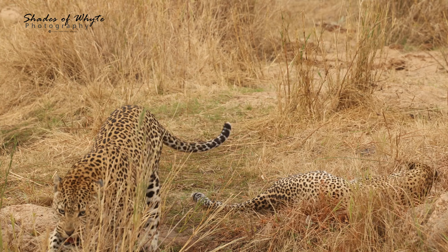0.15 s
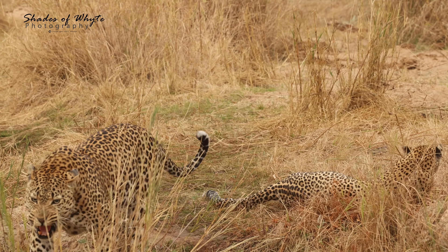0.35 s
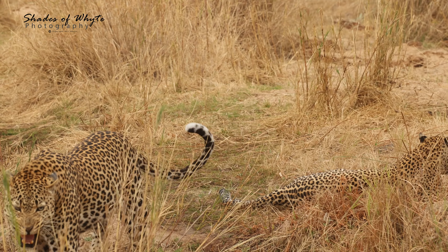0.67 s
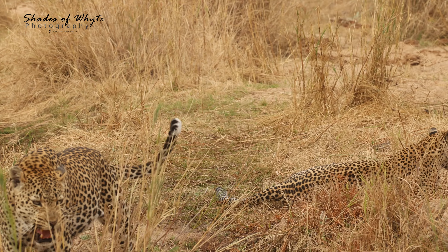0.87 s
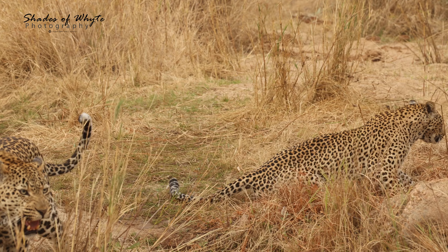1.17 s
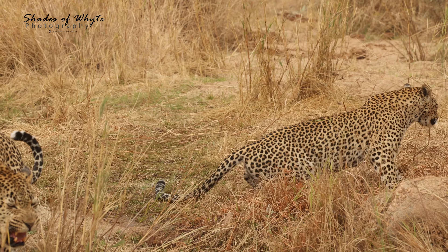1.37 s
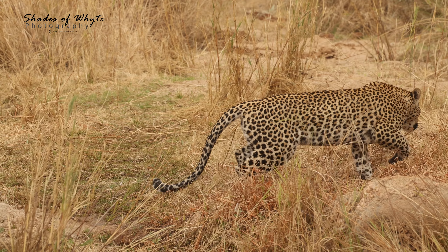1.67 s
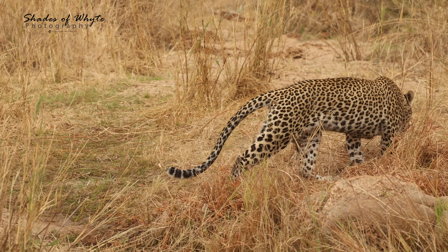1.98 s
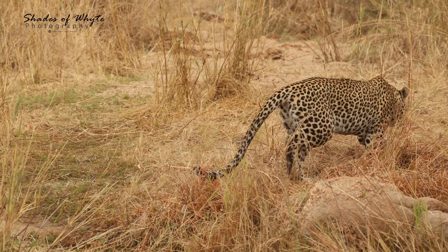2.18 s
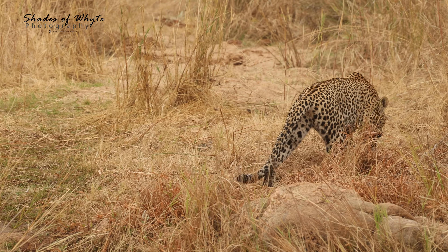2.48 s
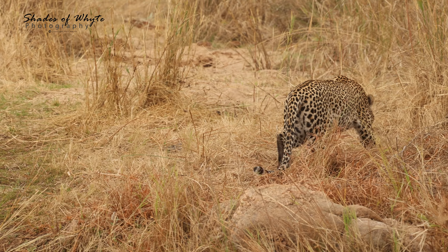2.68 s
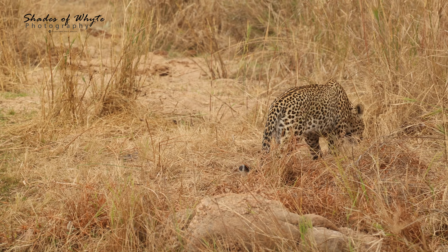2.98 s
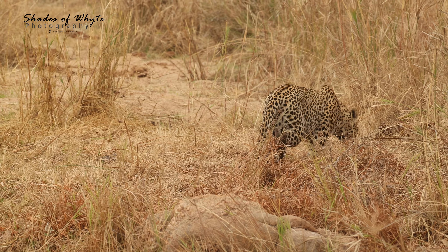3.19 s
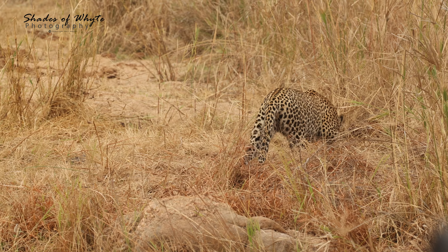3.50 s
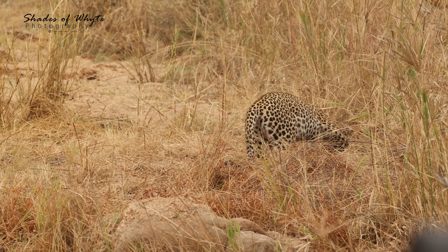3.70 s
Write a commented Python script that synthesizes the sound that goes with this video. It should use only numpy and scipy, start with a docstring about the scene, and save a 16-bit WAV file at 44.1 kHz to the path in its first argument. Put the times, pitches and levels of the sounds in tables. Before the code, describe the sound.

Leopards snarl and growl fiercely in dry grass, then grumble low before a sharp click

```python
"""Growls and snarls of two leopards in dry grass run throughout: throat flaps that ring the chest and send
puffs through the mouth, over rough air and wavering whistles. Some later growls have a nearly shut mouth.
Dry grass ticks are short noise bursts; close by on the left, shaped noise scuffs and clicks sharply.
Filtered noise underneath gives still air, a high hiss, a thin whine and an insect's throbbing trill."""
import sys
import numpy as np
from scipy import signal
from scipy.fft import rfft, irfft, next_fast_len
from scipy.io import wavfile

SR = 44100
rng = np.random.default_rng(int(sys.argv[2]) if len(sys.argv) > 2 else 0)


def store_pcm(level_fs):
    """Save levels as 16-bit WAV."""
    pcm = np.round(np.clip(level_fs, -1, 1) * 32767).astype(np.int16)
    wavfile.write(sys.argv[1], SR, np.atleast_2d(pcm).T)


N = 169785
T = np.arange(N) / SR

# Runs of throat flaps: (first flap [s], last flap [s], nominal rate [flaps/s], last gap / first gap [ratio],
# nominal chest pitch [Hz], nominal chest T60 [s])
GROWLS = [(0.025, 0.208, 27, 1, 153.5, 0.084), (0.242, .408, 49, 1, 178, 0.023),
          (0.451, 0.487, 24, 1, 166, 0.065), (0.6, 0.638, 26, 1, 221, 0.036),
          (0.654, 0.737, 13, 1, 167, 0.025), (.795, 1.008, 19, 1.15, 157, 0.055),
          (1.15, 1.166, 38, 1, 166, 0.04), (1.217, 1.328, 37, 1, 173, 0.033),
          (1.365, 1.424, 33, 0.98, 164, 0.025), (1.577, 1.798, 18, 1.4, 163, 0.076),
          (2.107, 2.136, 33, 1, 183, 0.039), (2.324, 2.366, 23, 1, 197, 0.046),
          (2.566, 2.761, 15.4, 1.2, 160.3, 0.087), (2.738, 2.928, 53, 1, 235.5, 0.068),
          (3.135, 3.347, 14, 1, 248.5, 0.11), (3.532, 3.655, 57, 0.956, 241, 0.056),
          (3.686, 3.833, 14, 1.1, 235, 0.13)]
# Effort through each snarl, before trims:
# (time [s], chest thump [dB], mouth puff [dB], air [dB])
LUNGE = [(0, -38, -38, -29.5), (.03, -26.5, -26, -36), (.066, -29.5, -41, -40.5)]
ROAR = [(.066, -32, -53, -45.5), (.1, -22.5, -32, -42.5), (.135, -32.5, -36.5, -42),
        (.175, -27.5, -55, -52), (.21, -24.5, -67, -47.5), (.27, -21.5, -58, -71), (.34, -27, -55, -58)]
SPIT = [(.34, -20, -59, -57.5), (.378, -21.5, -57, -49), (.392, -33, -39, -50), (.41, -19, -43, -45.5),
        (.45, -53, -41.5, -52), (.53, -34, -61, -52.5), (.6, -29.5, -43, -41.5), (.64, -33, -43.5, -50.5),
        (.66, -48, -35.5, -59), (.69, -50, -75, -78)]
HISS = [(.69, -50, -55, -60), (.727, -30, -38, -48.5), (.735, -35, -35.5, -38.5), (.81, -43, -49, -42),
        (.86, -40, -34.5, -46), (.9, -29, -36, -45), (.95, -35, -41, -56.5), (1.01, -42.5, -65, -56.5),
        (1.1, -55, -68, -74.5)]
RATTLE = [(1.12, -43.5, -76, -58), (1.22, -39.5, -49, -58), (1.25, -39, -44.5, -62),
          (1.275, -51, -48.5, -53), (1.302, -31, -41, -60), (1.33, -28.5, -39.5, -63),
          (1.365, -36, -44.5, -50), (1.395, -28.5, -41.5, -62), (1.43, -52, -45.5, -57),
          (1.5, -55, -60, -64.5)]
WARNING = [(1.52, -55, -60, -62), (1.535, -52, -55, -49.5), (1.575, -47.5, -39.5, -46.5),
           (1.625, -41.5, -31.5, -55), (1.68, -40.5, -40, -49.5), (1.74, -33.5, -42, -51.5),
           (1.805, -43, -39.5, -64), (1.86, -50, -37, -62.5)]
MUTTER = [(2.08, -60, -59, -77), (2.14, -42.5, -59.5, -65.5), (2.33, -47.5, -47, -63.5),
          (2.38, -49, -68, -64), (2.47, -55, -60, -62)]
PARTING = [(2.555, -39, -41.5, -49), (2.58, -43, -38, -51.5), (2.63, -42, -38.5, -47.5),
           (2.69, -48, -39.5, -56.5), (2.742, -43, -70, -56), (2.765, -38.5, -54, -64),
           (2.8, -51.5, -64, -64)]
GRUMBLE = [(2.8, -43.5, -68, -62), (2.89, -42.5, -61.5, -66), (2.95, -56.5, -55, -76),
           (3.13, -47, -64, -82), (3.28, -43, -51.5, -76), (3.35, -46.5, -55.5, -72),
           (3.53, -39.5, -60, -61), (3.64, -43.5, -55.5, -79), (3.7, -42.5, -52.5, -56.5),
           (3.76, -47.5, -66, -64.5), (3.85, -51, -55, -58)]
# Mouth resonances of each snarl: (frequency [Hz], width [Hz], relative level [dB])
LUNGE_MOUTH = [(1010, 140, -4), (1420, 66, -5), (1680, 93, 4), (2620, 24, -7), (3070, 37, -7.5),
               (3730, 85, -10)]
ROAR_MOUTH = [(532, 21, 2), (960, 150, -11.5), (1388, 27, -5.5), (1660, 27, -5.5), (1910, 89, -12),
              (2420, 170, -8), (3085, 110, -12)]
SPIT_MOUTH = [(1003, 194, 1.5), (2014, 250, 0), (2870, 140, -28), (3740, 32, -24), (3980, 57, -2.5),
              (4610, 120, -7), (5340, 310, -12.5), (6900, 68, -1.5)]
HISS_MOUTH = [(950, 66, -3), (1310, 58, -1.5), (1573, 25, -0.5), (1904, 8, 2), (2160, 41, -6.5),
              (2477, 20, 0.5), (2950, 130, -13), (4260, 340, -19.5), (5500, 130, -26)]
RATTLE_MOUTH = [(872, 150, -2), (1707, 59, -2), (1956, 43, -5), (2970, 180, -16), (3260, 50, -18),
                (3740, 260, -33), (4500, 60, -16)]
WARNING_MOUTH = [(914, 110, -3.5), (1224, 39, 0.5), (1495, 34, -8), (2120, 370, -13), (3220, 66, -15),
                 (3670, 21, -21)]
PARTING_MOUTH = [(940, 105, -0.5), (1213, 55, 2), (1523, 19, -2.5), (1760, 49, -11), (2090, 190, -9.5),
                 (3080, 32, -29)]
SHUT_MOUTH = [(840, 140, 2), (1160, 170, -3.5), (1760, 160, -13.5)]
# Snarls, panned before the cats' shared balance:
# (effort [table], mouth [table], left over right [dB], broad rasp [dB])
SNARLS = [(LUNGE, LUNGE_MOUTH, 1, -5), (ROAR, ROAR_MOUTH, 1, -4.5), (SPIT, SPIT_MOUTH, 0.67, -4),
          (HISS, HISS_MOUTH, 0.87, -5), (RATTLE, RATTLE_MOUTH, 1, -3.5), (WARNING, WARNING_MOUTH, 0, -8),
          (MUTTER, SHUT_MOUTH, -0.64, -17), (PARTING, PARTING_MOUTH, -0.13, -8.5),
          (GRUMBLE, SHUT_MOUTH, -0.19, 4)]
# Colour of the broad rasp: (frequency [Hz], relative level [dB])
RASP = [(200, 8), (400, 2), (700, -9), (1000, -15.5), (2000, 1), (4000, -6.5), (6500, -16.5), (9000, -28),
        (15000, -38)]
# Colour of the breath ahead of the mouth resonances: (frequency [Hz], relative level [dB])
AIR_COLOUR = [(300, -20), (550, 0), (950, 1.5), (1400, -2), (5000, -4), (9000, -25), (15000, -22)]
# Chest modes: (multiple of chest pitch [ratio], relative level [dB], share of chest T60 [ratio])
CHEST = [(.45, -7, 1.35), (.8, -2.5, 1.06), (1.05, 3, 1.02), (1.6, -8.5, 0.83), (2.7, -15.5, 0.3)]
# Whistles in the throat, before waver: (start [s], end [s], start pitch [Hz], end pitch [Hz], level [dB])
WHISTLES = [(0, 0.047, 1690, 1800, -35), (.09, 0.161, 565, 530, -45.5), (.15, 0.23, 1610, 1605, -56),
            (0.726, .895, 2490, 2425, -47), (.735, 0.823, 1250, 1310, -46),
            (1.616, 1.724, 1195, 1255, -57.5)]
# Tonal balance of the cats between the sides: (frequency [Hz], left over right [dB])
CATS_BALANCE = [(150, -0.68), (300, -1.8), (1000, 0.91), (2200, -1.5), (4500, 2.4)]
# Dull ground echoes: (delay [s], level [dB])
GROUND = [(.0065, -11), (0.0133, -17), (.033, -10.5)]
# Colour of the still air: (frequency [Hz], relative level [dB])
FLOOR = [(15, -53), (25, -2), (140, -1), (274, -9), (349, 0.5), (598, -6), (741, -9.5), (804, -8.5),
         (1710, -15.5), (3170, -19), (3720, -18.5), (4040, -18.5), (5580, -16.5), (7100, -22),
         (15500, -27.5)]
# High hiss through time, before its trim: (time [s], level [dB])
TREBLE = [(0, -69), (.25, -72), (1.45, -72), (1.82, -69), (1.92, -65), (2.3, -63.5), (2.65, -61.5),
          (2.7, -69), (2.8, -61.5), (2.93, -66.5), (3.0, -65), (3.2, -67.5), (3.3, -64), (3.85, -67)]
# Colour of the high hiss: (frequency [Hz], relative level [dB])
TREBLE_COLOUR = [(1000, 2), (3700, 4.5), (6000, 1), (10000, -2), (12500, -1), (15500, -2.5)]
# Thin whine: (frequency [Hz], level [dB], width [Hz])
WHINE = [(3645, -71.5, 19), (7740, -78.5, 80)]
# Likeness of the two sides in wide noise: (frequency [Hz], left-right correlation [ratio])
LIKENESS = [(60, .98), (170, 0.65), (350, 0.26), (1000, 0.23), (3000, 0.15), (8000, 0.045), (15000, 0.032)]
# Insect trill through time, before its throb: (time [s], level [dB])
INSECT = [(0, -75), (2.4, -80), (2.8, -73), (3.85, -74.5)]
# Dry grass ticks, before their trim: (time [s], level [dB])
TICKS = [(2.7345, -50), (2.8459, -45), (2.875, -48), (3.2037, -45), (3.2757, -53), (3.4101, -52),
         (3.679, -46.5), (3.7473, -49)]
# Colour of the ticks: (frequency [Hz], relative level [dB])
TICK_COLOUR = [(1500, -18), (4000, -5), (7000, 4), (10000, -12), (15000, -18)]
# Scuffs around the click: (time [s], level [dB], rise constant [s], fall constant [s])
SCUFFS = [(3.367, -50.5, 0.0047, 0.015), (3.413, -48, 0.0024, 0.0067), (3.456, -41, 0.015, .014),
          (3.479, -42.5, 0.0022, 0.012), (3.525, -45.5, 0.021, 0.028), (3.556, -46.5, .008, .007)]
# Colour of the scuffs: (frequency [Hz], relative level [dB])
SCUFF_COLOUR = [(200, -11), (700, 0), (1500, 2.5), (2800, 0), (4000, -8), (5500, -7.5), (8000, -16),
                (15000, -34)]
# Sharp click close by: (time [s], level [dB], decay constant [s])
CLICKS = [(3.4896, -25, 0.0032)]
# Colour of the click: (frequency [Hz], relative level [dB])
CLICK_COLOUR = [(200, -15), (550, -36), (850, 2), (1300, 8.5), (1800, -26), (2500, 9), (3400, -12),
                (5300, -5), (7000, -13.5), (11000, -18.5), (15000, -26)]
# Tonal balance of the click and scuffs between the sides: (frequency [Hz], left over right [dB])
CLICK_BALANCE = [(200, 3), (1000, 3), (2300, 11), (5000, 11), (12000, 8)]

FLAP_SOFT_HZ, FLAP_SCATTER_DB, PITCH_SCATTER = 407, 2.8, 0.045  # pitch scatter is a ratio
PUFF_RISE_S, PUFF_FALL_S = 0.0013, 0.0063
PUFF_TRIM_DB, AIR_TRIM_DB, AIR_ROUGH_DB = 1, -3, 3
FADE_S = 0.016
CATS_LEAD_S, CLICK_LEAD_S = 0.00003, 0.000227  # left side leads
ECHO_DB, ECHO_T60_S = -11, 0.19
FLOOR_DB, FLOOR_TOP_HZ, TREBLE_TRIM_DB = -57, 3970, 4.5
TICK_S, TICK_TRIM_DB = 0.0015, -2.5
CLICK_TAIL_DB, CLICK_TAIL_S = -9, 0.012
CUTOFF_HZ = 15800


def from_db(db):
    """Turn decibels into an amplitude factor."""
    return 10 ** (np.asarray(db) / 20)


def rms_one(x):
    """Scale a sound to an RMS of one."""
    return x / np.sqrt(np.mean(x ** 2) + 1e-20)


def at_hz(points, hz):
    """Read a curve along a logarithmic frequency axis."""
    hzs, values = np.transpose(points)
    return np.interp(np.log(hz + 1), np.log(hzs + 1), values)


def shaped(x, gain):
    """Filter by a gain that is a function of frequency."""
    size = next_fast_len(N)
    spectrum = rfft(x, size) * gain(np.fft.rfftfreq(size, 1 / SR))
    return irfft(spectrum, size)[..., :N]


def noise(colour):
    """Random noise with a given spectral colour."""
    return rms_one(shaped(rng.standard_normal(N), lambda hz: from_db(at_hz(colour, hz))))


def wide_noise(colour):
    """Stereo noise, alike in the bass and nearly unrelated in the treble."""
    def likeness(hz):
        return np.clip(at_hz(LIKENESS, hz), -1, 1)
    mid = shaped(noise(colour), lambda hz: np.sqrt(1 + likeness(hz)))
    side = shaped(noise(colour), lambda hz: np.sqrt(1 - likeness(hz)))
    return rms_one(np.array([mid + side, mid - side]))


def near_noise(colour, scatter_db=-7):
    """Noise from one spot, with a diffuse share."""
    return noise(colour) + from_db(scatter_db) * wide_noise(colour)


def drift(rate_hz):
    """Smoothed random motion around zero, losing strength above the given rate."""
    return rms_one(shaped(rng.standard_normal(N), lambda hz: 1 / (1 + (hz / rate_hz) ** 2)))


def butter(x, hz, kind, order=2):
    """Low or high cut with a smooth passband."""
    sos = signal.butter(order, hz, kind, fs=SR, output="sos")
    return signal.sosfilt(sos, x + 1e-18)


def resonance(x, hz, width_hz):
    """A damped resonance that lets through a band around its pitch."""
    r = np.exp(-np.pi * width_hz / SR)
    feed = np.array([1, 0, -1]) * (1 - r * r) / 2
    feedback = [1, -2 * r * np.cos(2 * np.pi * hz / SR), r * r]
    return signal.lfilter(feed, feedback, x + 1e-18)


def pan(left_db):
    """Gains for the two sides, differing by left_db."""
    return from_db([[left_db / 2], [-left_db / 2]])


def decay(start, fall_s):
    """An instant attack and exponential fall."""
    return (T >= start) * np.exp(-np.abs(T - start) / fall_s)


def add(out, s, sound):
    """Mix a short sound into out at a time in seconds."""
    i = max(int(s * SR), 0)
    out[i:i + len(sound)] += sound[:max(N - i, 0)]


def flaps():
    """Time the throat flaps as (s, chest Hz, T60 s); gaps may stretch or shrink through a run."""
    rows = []
    for first, last, rate, slowing, hz, t60 in GROWLS:
        gap_count = max(int(round((last - first) * rate)), 1)
        gaps = np.geomspace(1, slowing, gap_count)
        progress = np.append(0, np.cumsum(gaps)) / gaps.sum()
        rows += [(s, hz, t60) for s in first + (last - first) * progress]
    return rows


def chest(pulses):
    """Each flap rings the low, damped modes of chest and throat."""
    times, thump_db = np.vstack([snarl[0] for snarl in SNARLS]).T[:2]
    out, t = np.zeros(N), T[:SR // 8]
    for s, hz, t60 in pulses:
        effort_db = np.interp(s, times, thump_db)
        for k, (multiple, db, share) in enumerate(CHEST):
            detune, strength = rng.standard_normal(2)
            mode_hz = hz * multiple * (1 + PITCH_SCATTER * detune)
            ring = np.sin(2 * np.pi * mode_hz * t) * np.exp(-np.log(1000) * t / (t60 * share))
            level = from_db(effort_db + db + FLAP_SCATTER_DB * strength)
            add(out, s, (-1) ** k * ring * level)
    return butter(out, FLAP_SOFT_HZ, "low", order=1) * pan(left_db=2.5)


def mouths(pulses):
    """Puffs and a rough stream of air pass through the resonances of the mouth, beside a broad rasp."""
    puffs, t = np.zeros(N), T[:SR // 8]
    puff = (1 - np.exp(-t / PUFF_RISE_S)) * np.exp(-t / PUFF_FALL_S)
    for s, _, _ in pulses:
        add(puffs, s, puff)
    rough = from_db(AIR_ROUGH_DB * drift(105))
    rasp, air, out = wide_noise(RASP), noise(AIR_COLOUR), 0
    for effort, mouth, left_db, rasp_db in SNARLS:
        s, _, puff_db, air_db = np.transpose(effort)
        gate = np.clip(np.minimum(T - s[0], s[-1] - T) / FADE_S + 0.5, 0, 1)
        puff_flow = puffs * from_db(np.interp(T, s, puff_db) + PUFF_TRIM_DB)
        air_flow = rough * from_db(np.interp(T, s, air_db) + AIR_TRIM_DB)
        flow = gate * np.hypot(puff_flow, air_flow)
        # unmodulated air through the same mouth sets the loudness reference
        sources = np.array([air, air * flow])
        steady, voiced = sum((-1) ** k * from_db(db) * resonance(sources, hz, width)
                             for k, (hz, width, db) in enumerate(mouth))
        out = out + pan(left_db) * (voiced / steady.std() + from_db(rasp_db) * rasp * flow)
    return out


def whistles():
    """Gliding sine tones in the throat waver in pitch and strength."""
    waver, out = 1 + 0.00745 * drift(79.4), 0
    for start, end, start_hz, end_hz, db in WHISTLES:
        hz = np.interp(T, [start, end], [start_hz, end_hz]) * waver
        fade = np.clip(np.minimum(T - start, end - T) / FADE_S, 0, 1)
        out = out + from_db(db) * fade * np.sin(2 * np.pi * np.cumsum(hz) / SR)
    return out * from_db(2.9 * drift(50))


def placed(x, lead_s, balance):
    """The left side hears the sound earlier, and louder or softer by frequency."""
    side = np.array([[0.5], [-0.5]])

    def direction(hz):
        return from_db(side * at_hz(balance, hz)) * np.exp(2j * np.pi * hz * lead_s * side)
    return shaped(x, direction)


def surroundings(x):
    """Grass and ground scatter the sound: the treble differently to each side, the bass alike."""
    t = T[:SR // 3]

    def tail():
        h = rng.standard_normal(len(t)) * np.exp(-np.log(1000) * t / ECHO_T60_S)
        return h / np.linalg.norm(h)

    def ground(hz):
        return sum(from_db(db) * np.exp(-2j * np.pi * hz * s) for s, db in GROUND)
    high = butter(x, 296, "high")
    low = butter(x.mean(axis=0), 480, "low", order=1)
    treble = np.array([signal.fftconvolve(side, tail())[:N] for side in high])
    return x + from_db(ECHO_DB) * treble + shaped(low, ground)


def background():
    """Coloured noise makes still air and a fluctuating high hiss; narrow resonances make a thin whine."""
    still = from_db(FLOOR_DB) * butter(wide_noise(FLOOR), FLOOR_TOP_HZ, "low", order=1)
    hiss_db = np.interp(T, *np.transpose(TREBLE)) + TREBLE_TRIM_DB
    hiss = from_db(hiss_db) * wide_noise(TREBLE_COLOUR)
    whine = sum(from_db(db) * rms_one(resonance(rng.standard_normal((2, N)), hz, width))
                for hz, db, width in WHINE)
    return still + hiss + whine


def insect(hz=5500, width_hz=200, pulses_per_s=29):
    """A faint trill: a narrow band of noise throbs with a wandering phase."""
    throb = 1 + np.sin(2 * np.pi * pulses_per_s * T + drift(8.9))
    trill = rms_one(resonance(rng.standard_normal((2, N)), hz, width_hz))
    return from_db(np.interp(T, *np.transpose(INSECT))) * throb * trill


def grass():
    """Small dry ticks: noise with an instant attack and a very short fall."""
    ticks = sum(from_db(db + TICK_TRIM_DB) * decay(s, TICK_S) for s, db in TICKS)
    return ticks * wide_noise(TICK_COLOUR)


def click():
    """A hard noise snap with a short tail, amid grainy scuffing."""
    snap = sum(from_db(db) * (decay(s, fall) + from_db(CLICK_TAIL_DB) * decay(s, CLICK_TAIL_S))
               for s, db, fall in CLICKS)
    scuff = sum(from_db(db) * np.exp(-np.maximum((s - T) / rise, (T - s) / fall))
                for s, db, rise, fall in SCUFFS)
    grain = from_db(3.4 * drift(290))
    return snap * near_noise(CLICK_COLOUR) + scuff * grain * near_noise(SCUFF_COLOUR)


def scene():
    """Place the cats in their surroundings, then layer the small close sounds and the background."""
    pulses = flaps()
    voices = chest(pulses) + mouths(pulses) + whistles()
    cats = surroundings(placed(voices, CATS_LEAD_S, CATS_BALANCE))
    return cats + background() + insect() + grass() + placed(click(), CLICK_LEAD_S, CLICK_BALANCE)


def record(dry):
    """Cut the deepest bass, and the top very steeply."""
    trimmed = butter(dry, 55, "high", order=3)
    return shaped(trimmed, lambda hz: 1 / np.sqrt(1 + (hz / CUTOFF_HZ) ** 200))


dry = scene()
out = record(dry)
store_pcm(out)
```